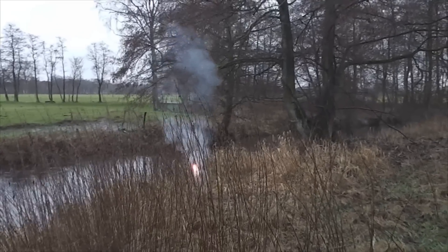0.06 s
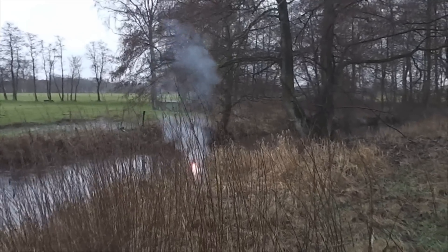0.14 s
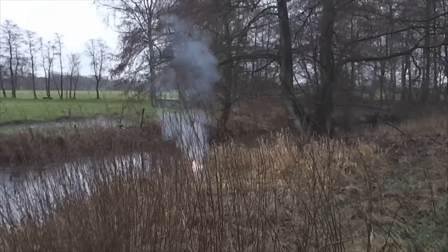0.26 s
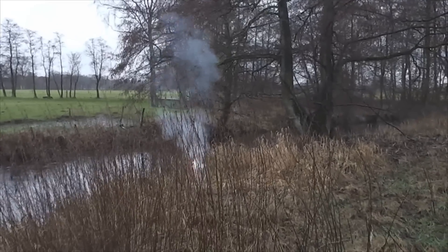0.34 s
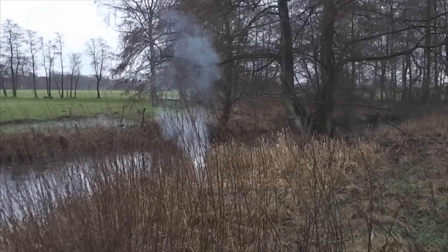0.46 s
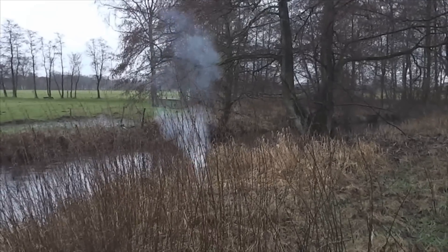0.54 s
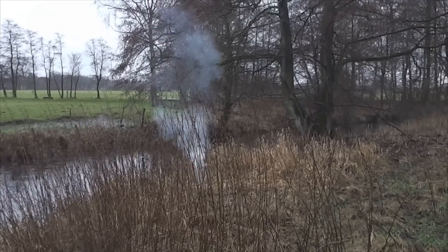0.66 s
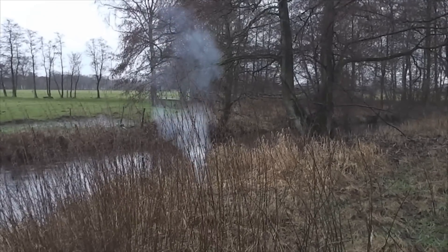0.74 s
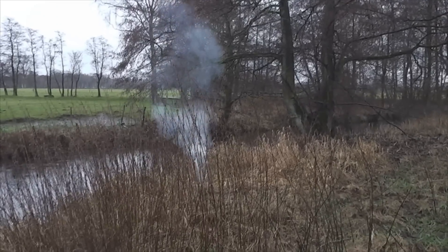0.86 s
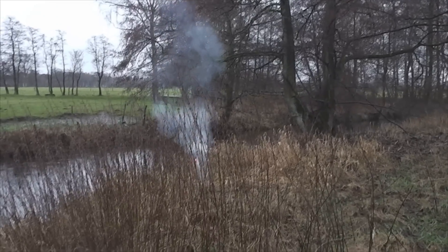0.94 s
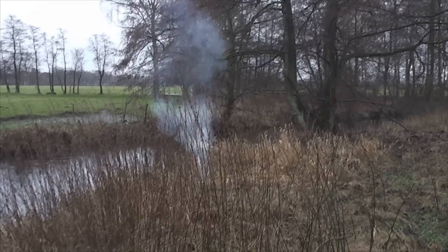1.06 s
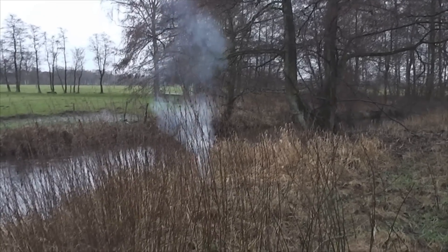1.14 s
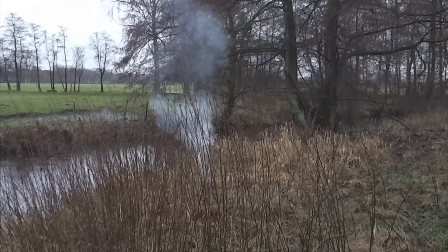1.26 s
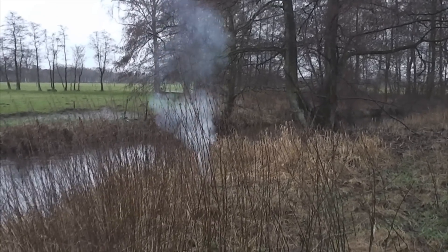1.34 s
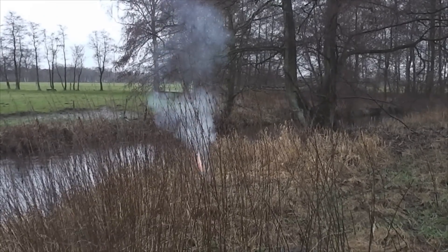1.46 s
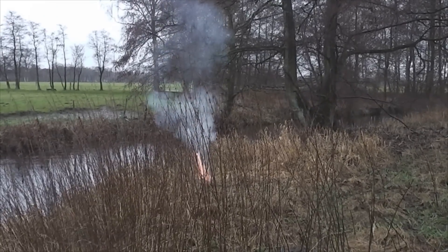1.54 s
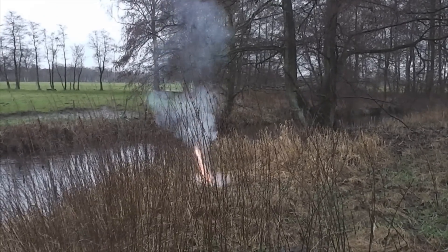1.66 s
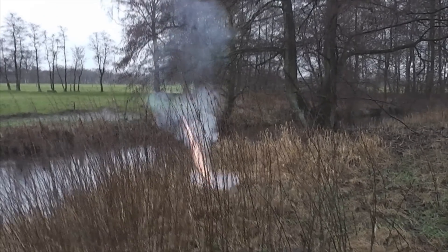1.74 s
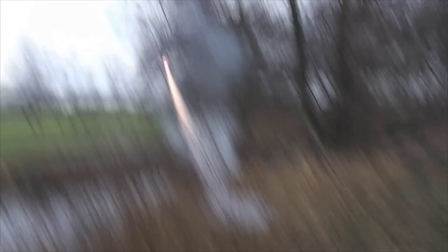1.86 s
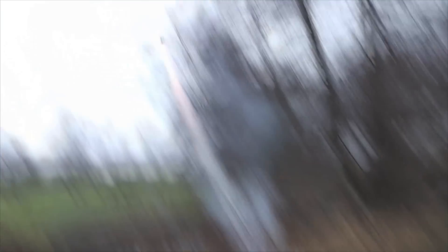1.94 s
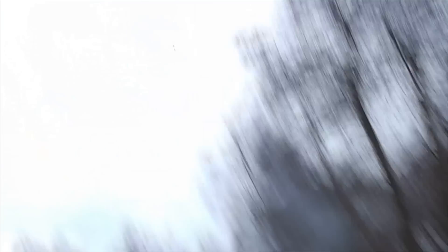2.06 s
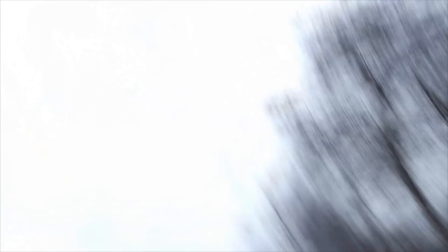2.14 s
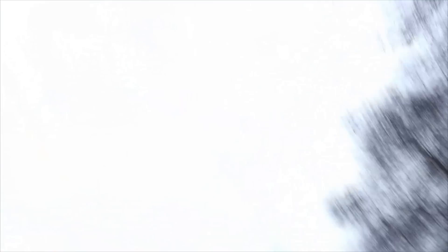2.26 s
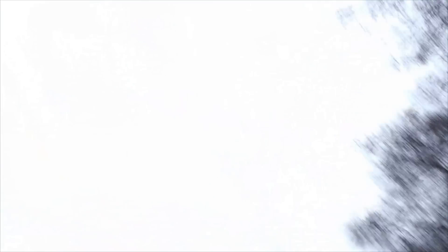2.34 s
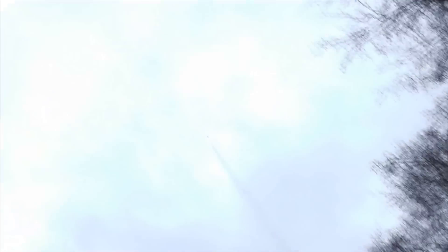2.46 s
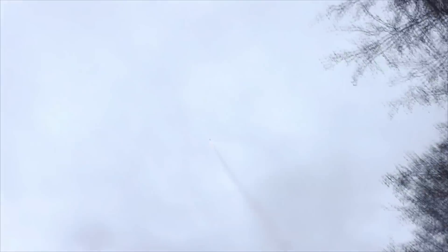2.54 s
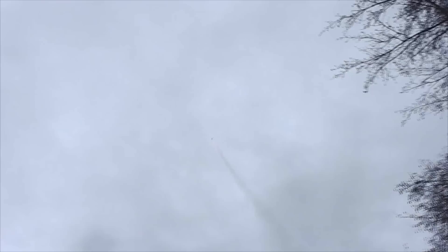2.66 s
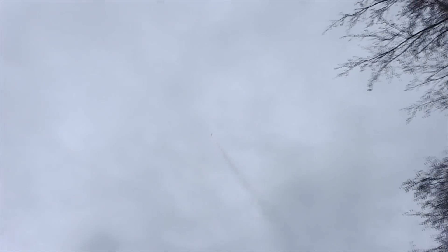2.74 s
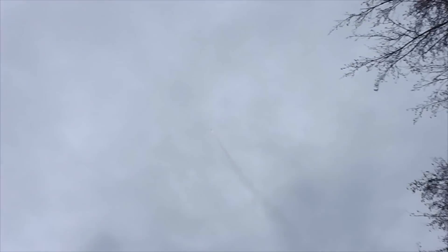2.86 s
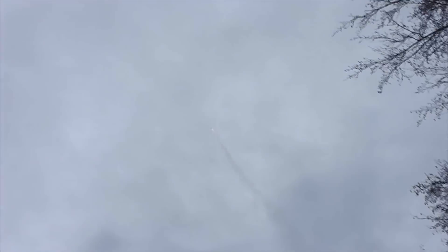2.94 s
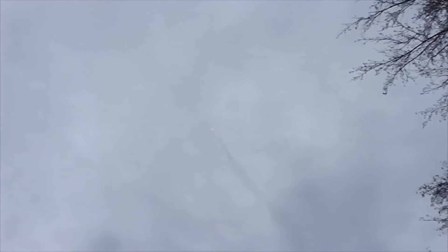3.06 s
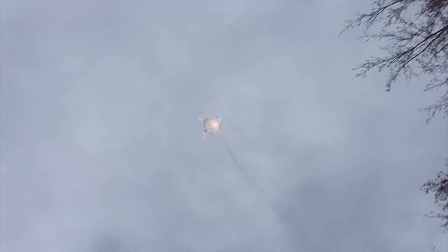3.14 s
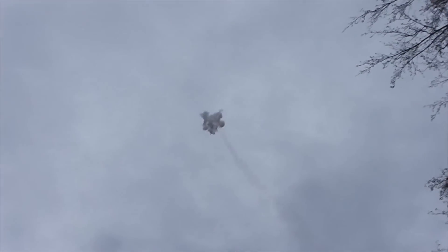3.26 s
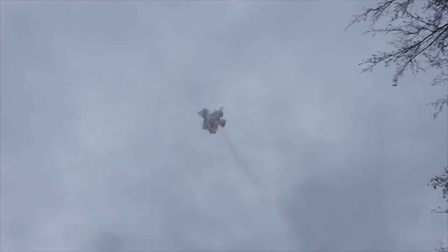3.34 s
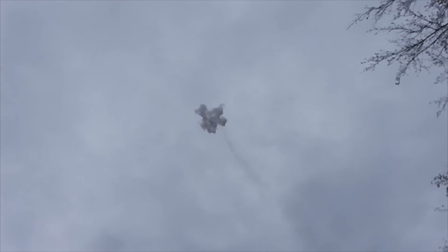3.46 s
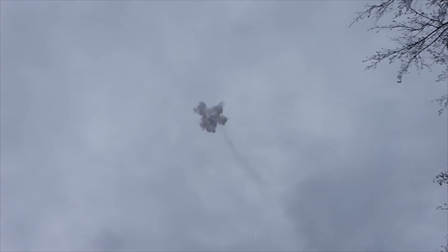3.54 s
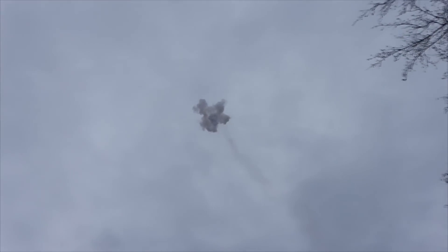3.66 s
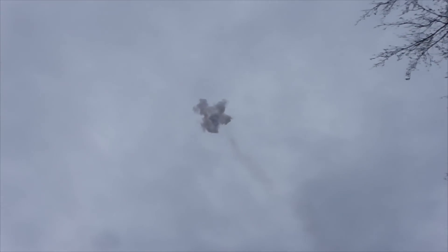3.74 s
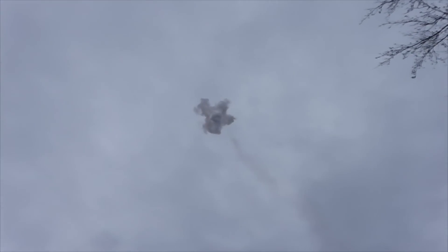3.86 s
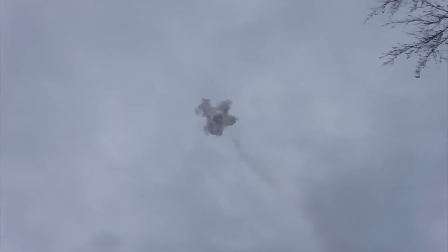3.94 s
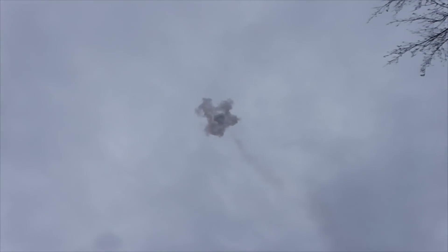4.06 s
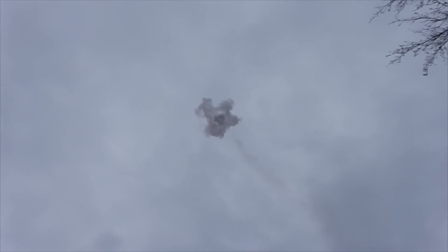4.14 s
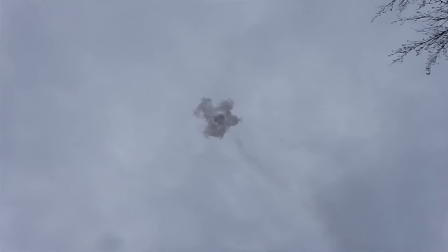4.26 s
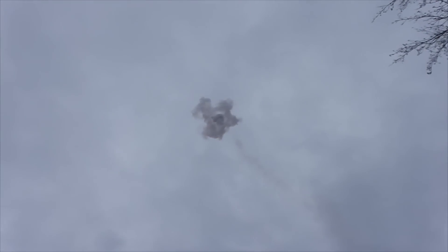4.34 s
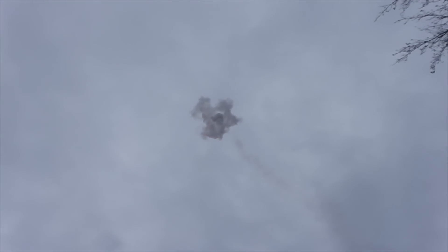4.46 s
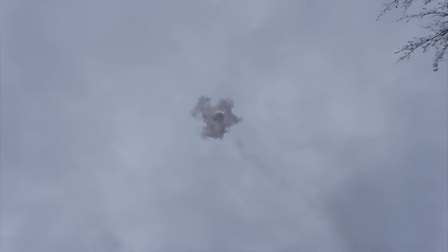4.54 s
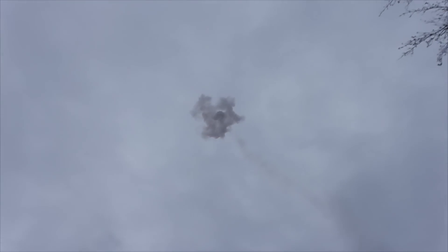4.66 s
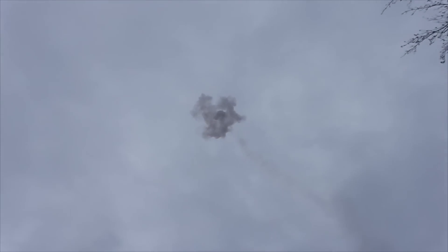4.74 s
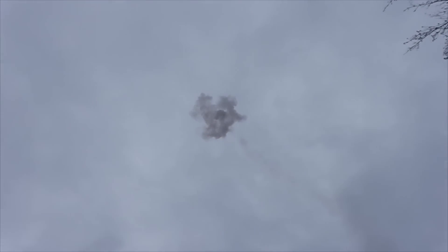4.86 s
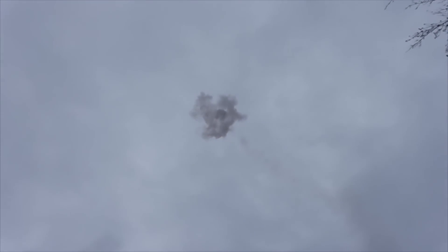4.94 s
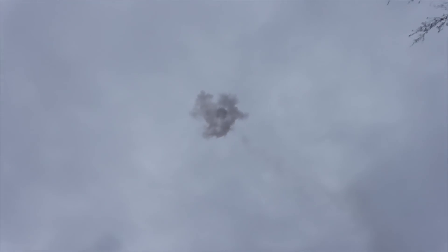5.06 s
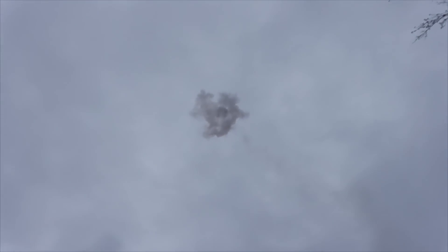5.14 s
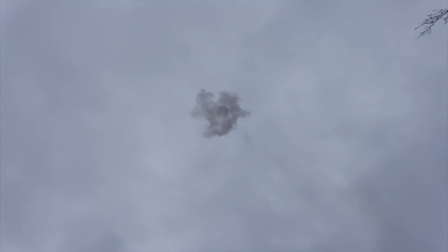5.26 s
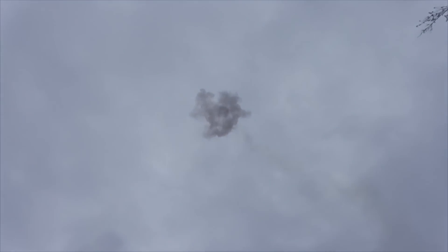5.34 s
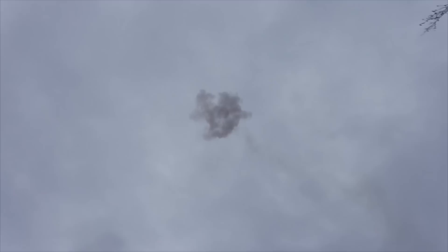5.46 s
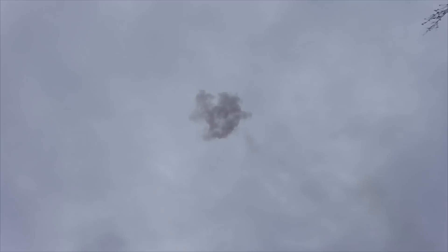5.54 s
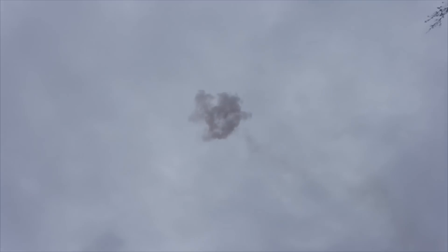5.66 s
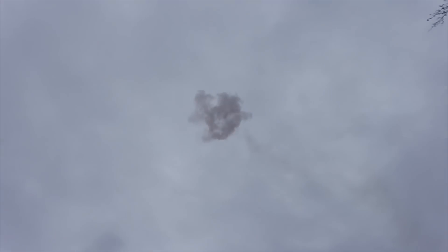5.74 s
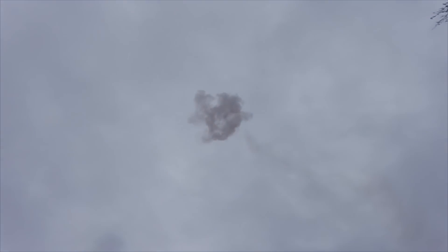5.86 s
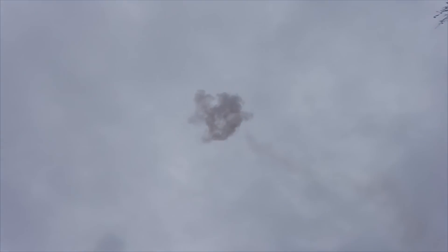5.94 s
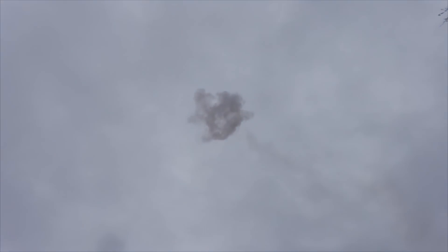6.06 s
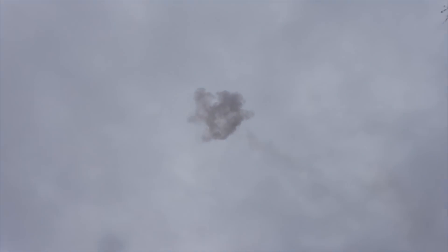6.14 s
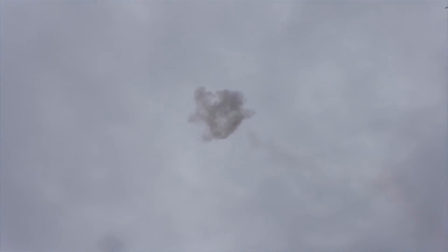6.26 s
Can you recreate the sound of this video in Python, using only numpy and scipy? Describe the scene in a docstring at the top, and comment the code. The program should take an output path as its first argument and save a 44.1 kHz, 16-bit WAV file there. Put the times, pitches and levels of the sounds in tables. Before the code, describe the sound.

A close handheld microphone beside reeds picks up soft, high fuse sizzling, then an abrupt bright jet whoosh with a downward-sweeping hollow colour and scattered reverberation from trees. It coughs out in quick pops. Less than a second later the salute explodes overhead, hard and distorted, followed by a thick rolling echo with heavy secondary thumps, decaying into a faint distant murmur.

```python
"""Firework rocket from a reed bed

In a reed bed beside a wood a fuse fizzes close by; the motor catches and climbs with a loud noisy hiss
that the ground reflects and the trees scatter. The salute bursts overhead as a train of pressure pushes:
the shock and its bounce off the ground overload the microphone. Woods and fields answer with a long
rolling echo of shaped noise that grows duller with time, over a faint murmur of open land."""
import sys
import numpy as np
from scipy import signal
from scipy.fft import rfft, irfft, next_fast_len
from scipy.io import wavfile
from scipy.ndimage import map_coordinates

SR = 44100
rng = np.random.default_rng(int(sys.argv[2]) if len(sys.argv) > 2 else 0)


def dump(signal):
    """Clip the signal to [-1, 1] and save it as 16-bit WAV at the path in sys.argv[1]."""
    limited = np.clip(np.atleast_2d(signal).T, -1, 1)
    pcm = np.round(limited * 32767).astype(np.int16)
    wavfile.write(sys.argv[1], SR, pcm)


N = 277388
LIFTOFF_S, BURNOUT_S = 1.685, 2.58  # full thrust lasts from the first to the second


def clock():
    """The time of each sample in s."""
    return np.arange(N) / SR


def amp(db):
    """Decibels to gain."""
    return 10 ** (np.asarray(db) / 20)


def unit(x):
    """Scale to rms 1."""
    return x / np.sqrt(np.mean(x ** 2) + 1e-20)


def along(points, hz):
    """Interpolate (frequency [Hz], value) points on a log frequency axis."""
    f, value = np.transpose(points)
    return np.interp(np.log(hz + 1), np.log(f + 1), value)


def envelope(start, end, rise, fall):
    """Gain that climbs at rise dB/s, holds 1 from start to end and dies at fall dB/s."""
    t = clock()
    return amp(-rise * np.maximum(start - t, 0) - fall * np.maximum(t - end, 0))


def level_curve(rows, fade_s):
    """Gain through (time [s], level [dB]) rows, fading exponentially outside their span."""
    s, db = np.transpose(rows)
    t = clock()
    outside = np.abs(t - np.clip(t, s[0], s[-1]))
    return amp(np.interp(t, s, db)) * np.exp(-outside / fade_s)


def wobble(rate):
    """A smooth random curve, rate knots a second."""
    knots = rng.standard_normal(int(N * rate / SR) + 4)
    return map_coordinates(knots, [np.arange(N) * rate / SR])


def filtered(x, response):
    """Multiply the spectrum of x by a response of frequency."""
    m = next_fast_len(N + SR // 2)
    hz = np.fft.rfftfreq(m, 1 / SR)
    return irfft(rfft(x, m) * response(hz), m)[..., :N]


def pan(left_db):
    """Channel gains for a left-minus-right level."""
    return amp(np.array([[left_db], [-left_db]]) / 2)


def noise(spectrum, stereo):
    """Stereo noise of rms 1, coloured by a spectrum and spread by mixing independent mid and side."""
    f, alike, left_db = np.transpose(stereo)
    m = next_fast_len(N)
    hz = np.fft.rfftfreq(m, 1 / SR)
    turn = np.arccos(np.clip(along(np.c_[f, alike], hz), -.9, .995)) / 2
    coloured = rfft(rng.standard_normal((2, m))) * amp(along(spectrum, hz))
    mid, side = coloured * [np.cos(turn), np.sin(turn)]
    balance = amp(along(np.c_[f, left_db], hz) * np.array([[1], [-1]]) / 2)
    return unit(irfft(np.array([mid + side, mid - side]) * balance, m)[:, :N])


def receding(x, start, air_db, power):
    """From start on the path grows, and the air takes air_db a second at 1 kHz, more above."""
    hz, t, z = signal.stft(x, SR, nperseg=512)
    loss = amp(-air_db * np.maximum(t - start, 0) * (hz[:, None] / 1000) ** power)
    return signal.istft(z * loss, SR, nperseg=512)[1][:, :N]


# spectrum of the open land: (frequency [Hz], density [dB per Hz])
AMBIENT_SPECTRUM = [(20, 0), (90, -0.5), (220, -7.5), (480, -5.5), (700, -3.5), (1150, -5), (1450, -10),
                    (2000, -17.5), (3000, -24), (7000, -20), (16000, -26)]
# the murmur sinks and comes back: (time [s], depth [dB], half width at 1/e of the depth [s])
LULLS = [(1.48, 2, 0.4), (2.25, 10.5, 0.26), (2.16, 17.5, 0.089)]
# stereo picture of distant, scattered sound: (frequency [Hz], left-right likeness, left minus right [dB])
FAR_STEREO = [(100, .99, 1.2), (400, 0.94, 1.4), (1000, 0.84, 1.9), (2440, 0.46, 0.94), (4000, 0.074, 1.3),
              (5500, 0.3, 1.5), (9820, -0.32, 0.41), (15000, 0.37, 0)]


def countryside(level_db=-47.5):
    """A faint distant murmur of open land with a thin hiss; it sinks for a moment in the climb."""
    dip_db = sum(db * np.exp(-((clock() - s) / width) ** 2) for s, db, width in LULLS)
    return amp(level_db - dip_db + 0.68 * wobble(1.8)) * noise(AMBIENT_SPECTRUM, FAR_STEREO)


def reeds(x, share=0.83, spread_s=.006, count=14):
    """Stalks around the launch spot add weak, very short reflections that ripple the spectrum."""
    lags = rng.uniform(0.14, 1, count) * spread_s * SR
    signs = rng.choice([-1, 1], count)
    reflections = sum(sign * np.roll(x, int(lag), axis=1) for sign, lag in zip(signs, lags))
    return unit(x + share * unit(reflections))


# flares of the burning fuse: (start [s], end [s], level [dB])
FUSE_FLARES = [(0.0, 0.06, -55), (0.085, 0.084, -46.5), (0.162, 0.223, -49.5), (0.26, 0.392, -47),
               (0.68, 0.88, -58.5), (0.91, 1.06, -54.5), (1.11, 1.504, -50)]
# spectrum of the fuse: (frequency [Hz], density [dB per Hz])
FIZZ_SPECTRUM = [(2000, -40), (3300, -21), (4500, -4), (5600, 3.5), (7000, -3.5), (8500, -3.5),
                 (10500, -13), (13000, -26), (16000, -30.5)]
# stereo picture of nearby sound: (frequency [Hz], left-right likeness, left minus right [dB])
NEAR_STEREO = [(100, 0.9, 1.5), (1600, 1, 0), (3040, 0.97, -1), (3900, 0.8, 2), (6500, 0.95, -2.5),
               (9000, 0.69, 5), (10500, 0.81, -2.5), (14030, 0.97, -1)]


def fuse(smoulder_db=-63, rise=260, fall=129.5):
    """The fuse smoulders in the reeds and fizzes up in flares of flickering noise (slopes in dB/s)."""
    flares = [amp(db) * envelope(start, end, rise, fall) for start, end, db in FUSE_FLARES]
    smoulder = amp(smoulder_db) * envelope(0, LIFTOFF_S, rise, fall)
    level = np.linalg.norm(flares + [smoulder], axis=0)
    flicker = unit(amp(1.3 * wobble(45) + 1.1 * wobble(600)))
    return level * flicker * reeds(noise(FIZZ_SPECTRUM, NEAR_STEREO))


# small ticks and sputters: (time [s], level before the common trim [dB])
TICKS = [(0.0812, -31.5), (0.3455, -33.5), (0.665, -43), (0.908, -37.5), (5.816, -35.5)]


def ticks(life_s=.005, trim_db=-8):
    """Short dry snaps: noise that starts at once and dies exponentially."""
    t = clock()
    snaps = sum(amp(db + trim_db) * (t >= s) * np.exp(-np.abs(t - s) / life_s) for s, db in TICKS)
    spectrum = [(500, -5.5), (2500, -13), (5500, 2.5), (10000, -9.5), (16000, -6.5)]
    return snaps * noise(spectrum, NEAR_STEREO)


# hiss of the jet: (time [s], level [dB])
JET_HISS = [(1.5, -55), (1.614, -33.5), (1.685, -26), (1.71, -14.5), (1.85, -15.5), (2.08, -12.5),
            (2.14, -18), (2.36, -16.5), (2.56, -9), (2.65, -18), (2.78, -32)]
# puffs of gas as the motor catches and as it burns through: (time [s], roar level [dB], low rush level [dB])
PUFFS = [(1.715, -21, -31), (2.65, -28.5, -25.5), (2.745, -36.5, -33.5)]
# spectra of the jet's high, middle and low voices: (frequency [Hz], density [dB per Hz])
HISS_SPECTRUM = [(1500, -42), (3000, -19.5), (3600, -16), (4400, -4), (5500, 0.5), (7500, -0.5),
                 (9000, -1.5), (11000, -8), (13000, -15), (16000, -25.5)]
ROAR_SPECTRUM = [(200, -35), (450, -11.5), (800, -3.5), (1200, 0), (1700, -0.5), (2400, -6), (2950, -9),
                 (3500, -2), (5000, -6), (9000, -34)]
LOW_RUSH_SPECTRUM = [(40, -29.5), (110, -19.5), (180, -8.5), (330, -1.5), (550, 0), (900, -4),
                     (2000, -36.5)]
# lag of the ground reflection as the rocket climbs: (time [s], lag [ms])
GROUND_LAG = [(1.6, 0.91), (1.9, 1.42), (2.0, 2.1), (2.1, 5.4), (2.2, 7.5), (2.3, 8.3), (2.53, 10.7),
              (2.7, 10.5)]


def motor(bounce=0.28, ground_hz=3500, turn_power=3.8):
    """The jet sputters as it burns; its ground reflection lags more as it climbs, sweeping a comb down."""
    hiss = level_curve(JET_HISS, fade_s=0.033)
    thrust = envelope(LIFTOFF_S, BURNOUT_S, rise=119.5, fall=113)
    # the lower voices swell as the nozzle turns towards the ground
    turned = np.clip((clock() - LIFTOFF_S) / (BURNOUT_S - LIFTOFF_S), 0, 1) ** turn_power
    roar = thrust * amp(-28 + 13 * turned)
    low_rush = thrust * amp(-44.5 + 10 * turned)
    for s, roar_db, rush_db in PUFFS:
        puff = envelope(s, s, rise=351.5, fall=132.5)
        roar = np.hypot(roar, amp(roar_db) * puff)
        low_rush = np.hypot(low_rush, amp(rush_db) * puff)
    lit = envelope(JET_HISS[0][0] + 0.035, N / SR, 300, 0)  # no full roar until the propellant has caught
    bright = receding(noise(HISS_SPECTRUM, NEAR_STEREO), start=2.12, air_db=0.3, power=1.625)
    lower = roar * noise(ROAR_SPECTRUM, NEAR_STEREO) + low_rush * noise(LOW_RUSH_SPECTRUM, NEAR_STEREO)
    sputter = unit(amp(1.1 * wobble(50) + 1 * wobble(400)))
    jet = (hiss * bright + lit * lower) * sputter
    n = np.arange(N)
    lag = np.interp(n / SR, *np.transpose(GROUND_LAG)) * SR / 1000  # in samples
    soft = filtered(jet, lambda hz: 1 / (1 + (hz / ground_hz) ** 2))  # grass swallows the treble
    return jet + bounce * np.array([np.interp(n - lag, n, side) for side in soft])


# ring of the wood's edge: (frequency [Hz], time to fall by 60 dB [s])
WOOD_RING = [(150, 2), (1000, 2.67), (2500, 1.8), (5500, 1.58), (9000, 0.91), (14000, 0.84)]


def wood(x, width=.5, count=14):
    """Trunks and twigs scatter the moving rocket's sound by ever new paths; treble dies first."""
    out = np.zeros((2, N))
    edges = np.linspace(JET_HISS[0][0] * SR, (JET_HISS[-1][0] + .2) * SR, count).astype(int)
    for a, b in zip(edges, edges[1:]):
        # each slice of the flight gets a fresh tail of decaying noise
        hz, t, z = signal.stft(rng.standard_normal((2, SR + SR // 2)), SR, nperseg=256)
        decay = amp(-60 * t / along(WOOD_RING, hz)[:, None])
        mid, side = signal.istft(z * decay, SR, nperseg=256)[1]
        tail = np.array([mid + width * side, mid - width * side]) / np.linalg.norm(mid)
        answer = signal.fftconvolve(x[:, a:b].mean(axis=0)[None], tail, axes=1)
        out[:, a:a + answer.shape[1]] += answer
    return out


# resonances of the nozzle: (frequency [Hz], width [Hz], level [dB])
NOZZLE = [(5600, 220, -5.5), (6340, 200, -6.5), (7370, 34, -3)]


def ignition(level_db=-20.5, hold_s=0.098, rise=180, fall=90):
    """Gas whistles through the nozzle while the rocket still stands on its stick (slopes in dB/s)."""
    def ring(f):
        return sum(amp(db) * 1j * f * w / (c * c - f * f + 1j * f * w) for c, w, db in NOZZLE)
    whistle = unit(filtered(rng.standard_normal(N), ring))
    return amp(level_db) * envelope(LIFTOFF_S, LIFTOFF_S + hold_s, rise, fall) * whistle * pan(-1)


# the motor coughs as it burns out: (time [s], level [dB])
COUGHS = [(2.6251, -6.5), (2.642, -7), (2.651, -12), (2.677, -10), (2.706, -10.5)]


def burnout(half_ms=0.28):
    """The last of the propellant leaves in lumps, each a single short pop."""
    t = clock()
    out = np.zeros(N)
    for s, db in COUGHS:
        near = slice(round(s * SR) - SR // 100, round(s * SR) + SR // 100)
        u = (t[near] - s) * 1000 / half_ms
        out[near] += amp(db) * (u * u - 1) * np.exp(-u * u / 2)
    return out


# a bright rush swells into the bang, then the nearest twigs scatter the shock:
# (start [s], end [s], level [dB], rise [dB/s], fall [dB/s])
BRIGHT_RUSHES = [(3.35, 3.37, -27.5, 127, 300), (3.356, 3.382, -22.5, 1800, 903),
                 (3.406, 3.445, -17, 2200, 65.5)]
# spectrum of that rush: (frequency [Hz], density [dB per Hz])
SCATTER_SPECTRUM = [(60, -24), (220, -14.5), (400, -9), (700, -4.5), (1400, -2.5), (2200, -14.5),
                    (2900, -15), (5500, -11.5), (8000, -16.5), (11000, -27.5), (16000, -44)]


def swell():
    """A bright rush around the bang: noise made grainy by a fast random level."""
    rushes = [amp(db) * envelope(start, end, rise, fall) for start, end, db, rise, fall in BRIGHT_RUSHES]
    grain = unit(amp(0.99 * wobble(300)))
    return np.linalg.norm(rushes, axis=0) * grain * noise(SCATTER_SPECTRUM, FAR_STEREO) * pan(-1.3)


# arrivals of the shock, direct, off the ground, then off trunks and tree lines: (time [s], level [dB])
SHOCKS = [(3.3819, 8.5), (3.3937, 9), (3.4086, 6.5), (3.4238, 7.5), (3.4301, -2), (3.4352, 2.5),
          (3.5873, 2.5), (3.622, 2.5), (4.241, 5.5), (4.322, 8), (4.362, 7.5), (4.475, 4.5), (4.589, 6),
          (4.606, 6.5), (4.7745, 8), (4.963, 6.5), (5.492, -6)]


def snap(level_db=7, ring_hz=4800, life_s=0.0002, lead_s=0.00024, again_s=0.0012, again_db=-5):
    """The direct shock's steep front, and its bounce off something close by, ring the microphone port."""
    def ring(start):
        t = np.maximum(clock() - start, 0)
        return -np.exp(-t / life_s) * np.sin(2 * np.pi * ring_hz * t)
    front = SHOCKS[0][0] - lead_s
    return amp(level_db) * (ring(front) + amp(again_db) * ring(front + again_s))


def salute(rebound_after=2.25, rebound=0.8, crack=0.19, crack_s=0.00065, low_cut_hz=55):
    """Each shock is a sudden push that sags into suction, then an opposite jolt; its front cracks."""
    def blast(u):
        return (u >= 0) * (1 - u) * np.exp(-np.abs(u))

    def aged(delay, direct, late, over_s):
        return late + (direct - late) * np.exp(-(delay / over_s) ** 2)

    t = np.arange(SR // 20) / SR
    out = np.zeros((2, N))
    for s, db in SHOCKS:
        # reflections are shorter and duller than the direct shock
        delay = s - SHOCKS[0][0]
        push_ms = aged(delay, direct=1.85, late=0.52, over_s=0.045)
        bright_hz = aged(delay, direct=11000, late=1300, over_s=0.022)
        u = 1000 * t / push_ms  # time in push lengths
        wave = blast(u) - rebound * blast(u - rebound_after)
        front = crack * np.exp(-t / crack_s) * rng.standard_normal((2, len(t)))
        dulling = signal.butter(2, min(bright_hz, SR / 2 - 1), fs=SR)
        start = round(s * SR)
        out[:, start:start + len(t)] += amp(db) * signal.lfilter(*dulling, wave + front)
    # the microphone passes no steady pressure, so each push overshoots
    return signal.lfilter(*signal.butter(1, low_cut_hz, "high", fs=SR), out)


# stretches of land that answer the bang, from the nearest trunks to a far tree line:
# (first echo [s], last echo [s], level [dB], fade [dB/s])
ANSWERING_LAND = [(3.429, 3.453, -15.5, 135), (3.7, 3.748, -9, 201), (3.82, 5.053, -8.5, 18),
                  (5.254, 5.26, -18, 114), (5.573, 5.794, -17, 13.5)]
# spectra of the rolling echo and of its bass: (frequency [Hz], density [dB per Hz])
RUMBLE_SPECTRUM = [(100, -20), (220, -8.5), (350, 1), (550, 0), (1000, -5.5), (1500, -10.5), (2000, -18),
                   (2600, -24.5), (5000, -22), (7000, -25.5), (10000, -31.5), (16000, -53)]
BOOM_SPECTRUM = [(20, -27), (45, -20.5), (75, -6.5), (115, -0.5), (180, -4), (280, -17), (600, -47),
                 (2000, -87)]


def echo(rumble_db=1.0, boom_db=-6.0, lumps_db=1.0, grain_db=1.0, boom_lumps_db=1.0):
    """Countless far reflections; the later they come, the more treble the air has taken."""
    answers = [amp(db) * envelope(first, last, 95, fade) for first, last, db, fade in ANSWERING_LAND]
    # almost no echo before the nearest trunks
    roll = np.linalg.norm(answers, axis=0) * envelope(ANSWERING_LAND[0][0], N / SR, 1500, 0)
    lumps = amp(lumps_db * wobble(35) + grain_db * wobble(220))
    crowd = noise(RUMBLE_SPECTRUM, FAR_STEREO) * lumps
    crowd = unit(receding(crowd, start=SHOCKS[0][0], air_db=1.32, power=1.463))
    # late echoes keep only the deepest bass
    deep = receding(noise(BOOM_SPECTRUM, FAR_STEREO), start=SHOCKS[0][0], air_db=17.5, power=0.87)
    boom = unit(deep * amp(boom_lumps_db * wobble(22)))
    return roll * (amp(rumble_db) * crowd + amp(boom_db) * boom)


def scene():
    """Fuse, climb, burst and echo over the quiet land."""
    rocket = ignition() + motor() + burnout()
    launch = fuse() + ticks() + rocket + amp(-12.5) * wood(rocket)
    burst = swell() + snap() + salute() + echo()
    return countryside() + launch + burst


def record(dry, top_hz=15900):
    """The microphone clips hard at full scale, so peaks crackle, and keeps nothing above its band limit."""
    return filtered(np.clip(dry, -1, 1), lambda hz: hz < top_hz)


dry = scene()
out = record(dry)
dump(out)
```